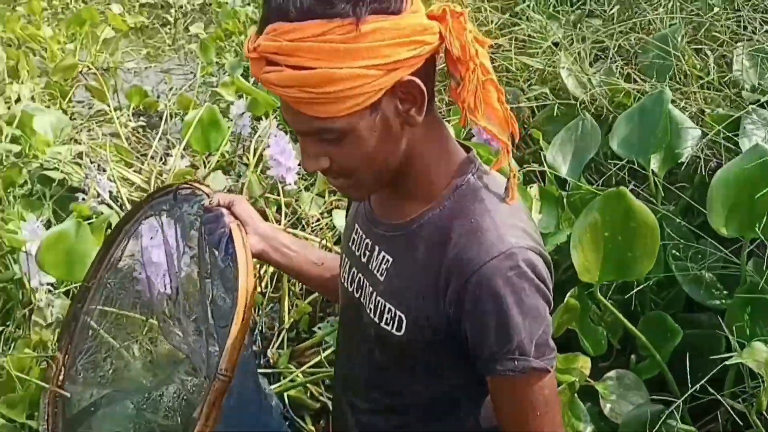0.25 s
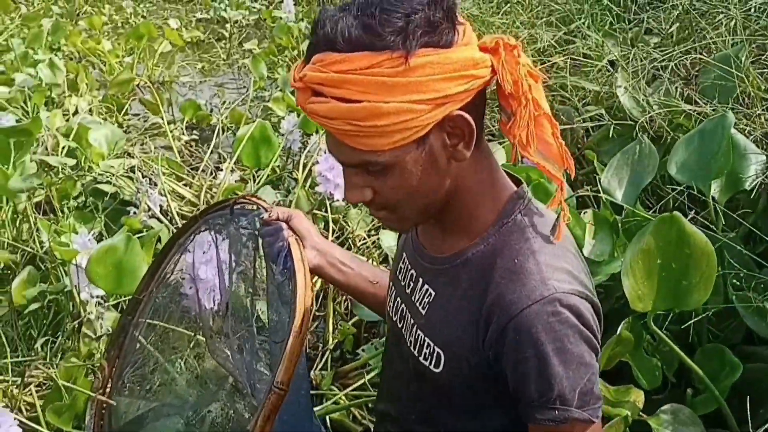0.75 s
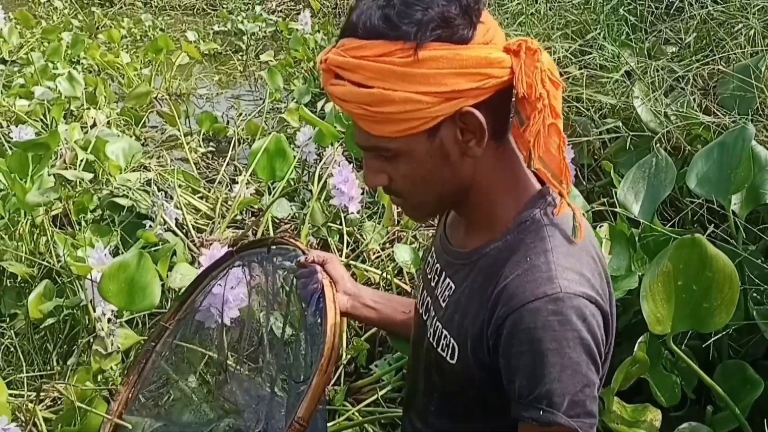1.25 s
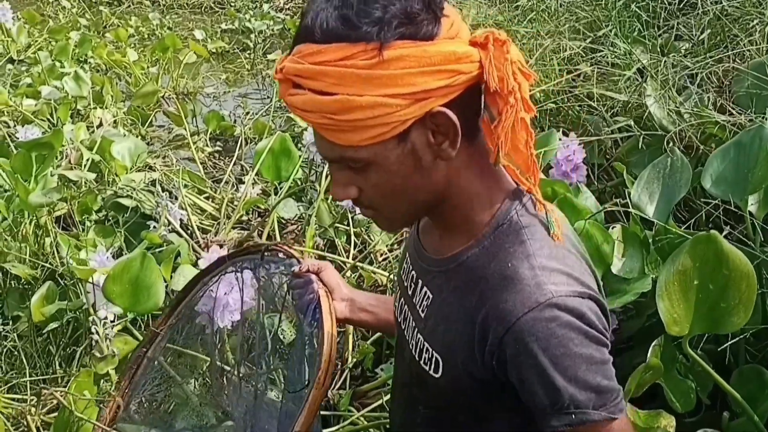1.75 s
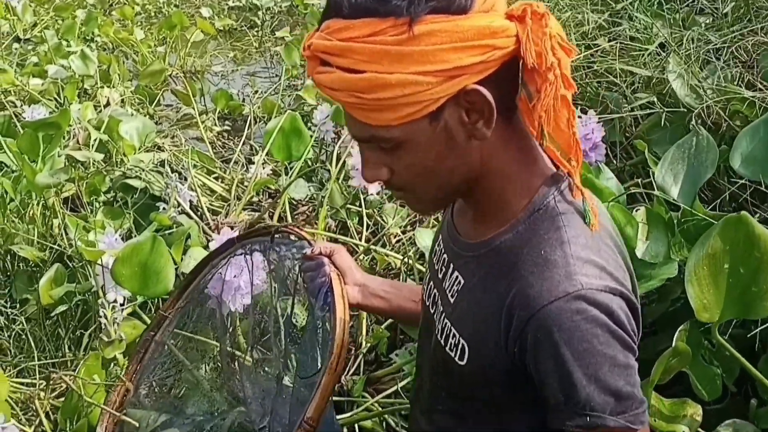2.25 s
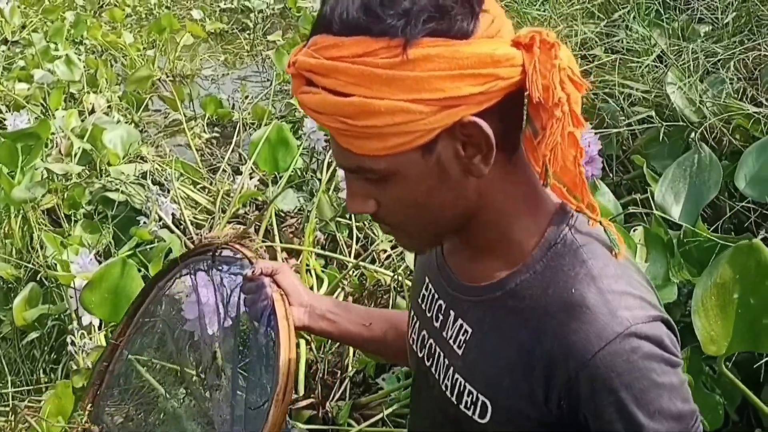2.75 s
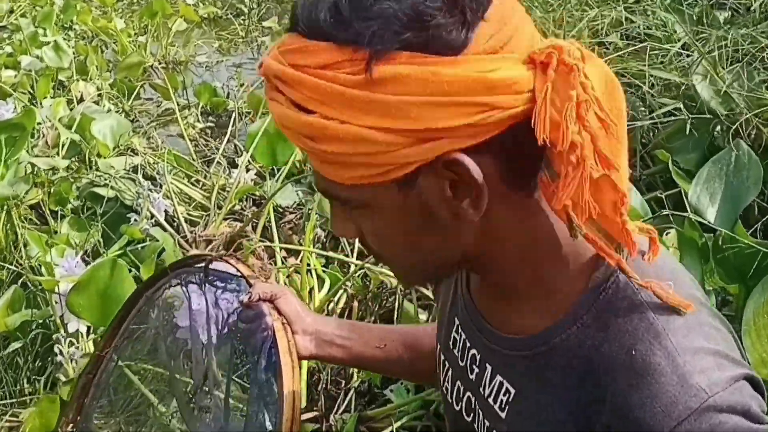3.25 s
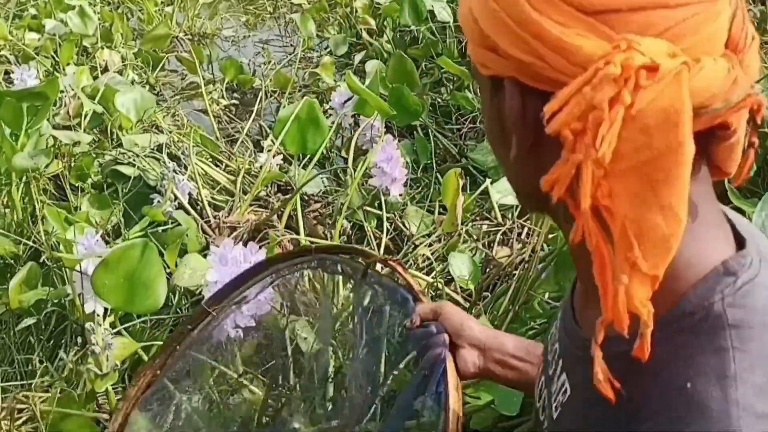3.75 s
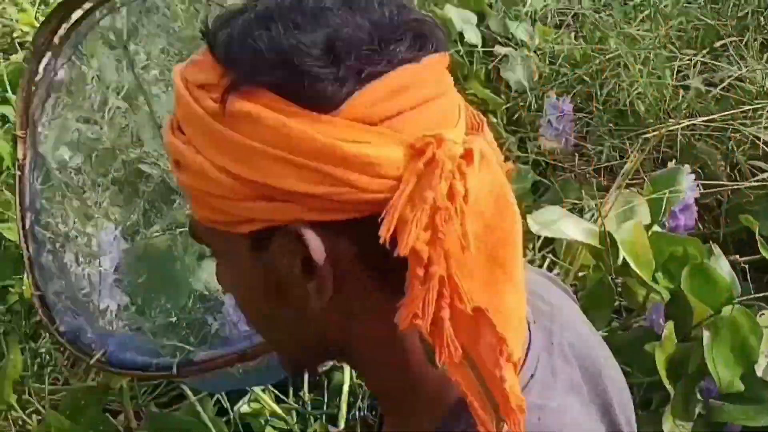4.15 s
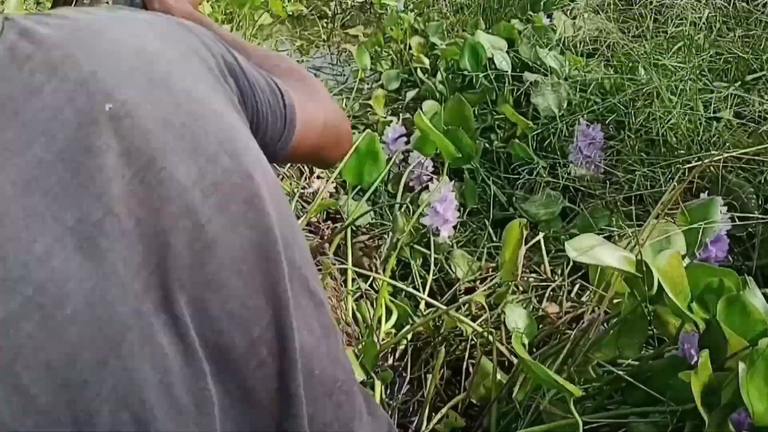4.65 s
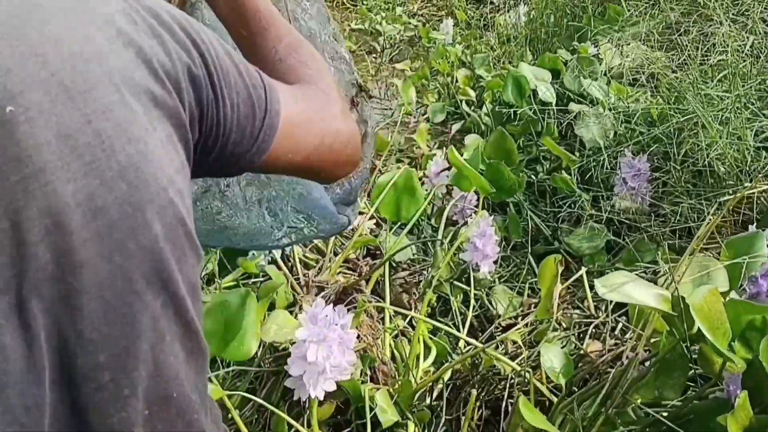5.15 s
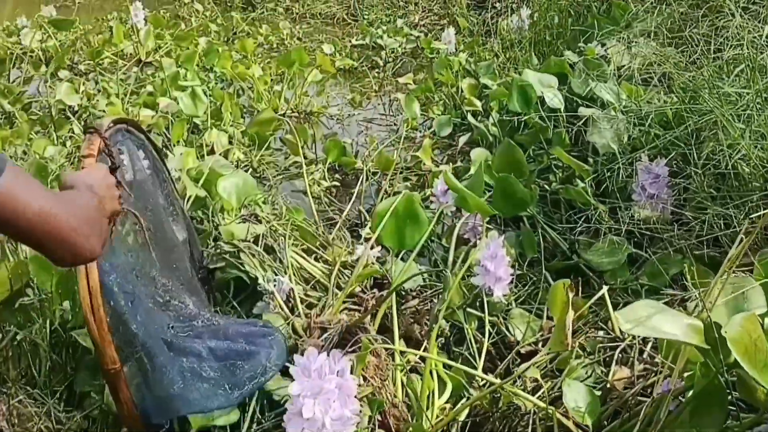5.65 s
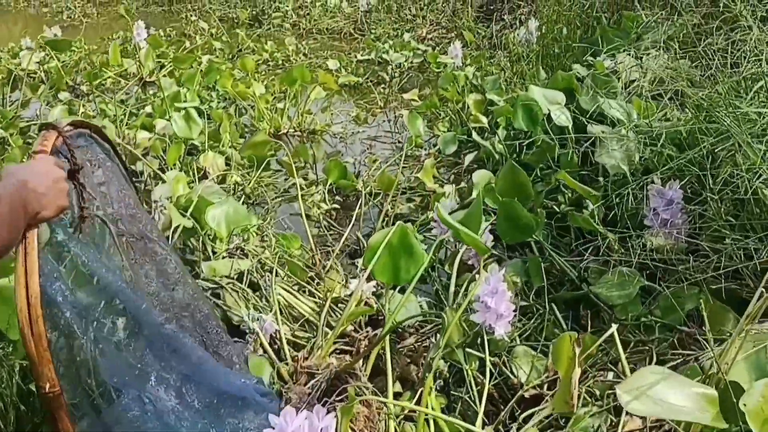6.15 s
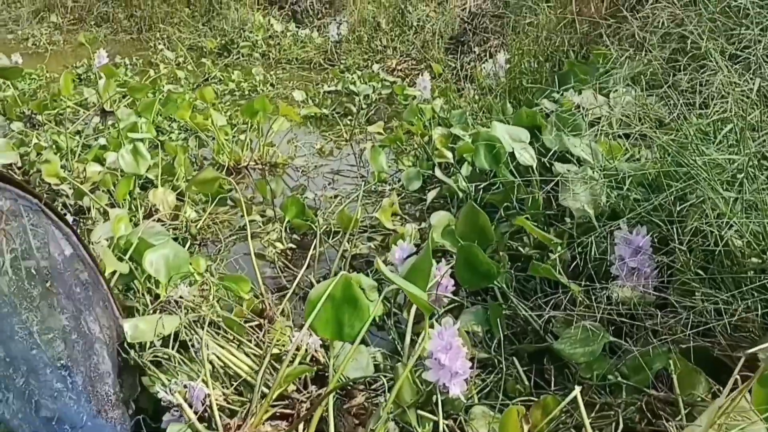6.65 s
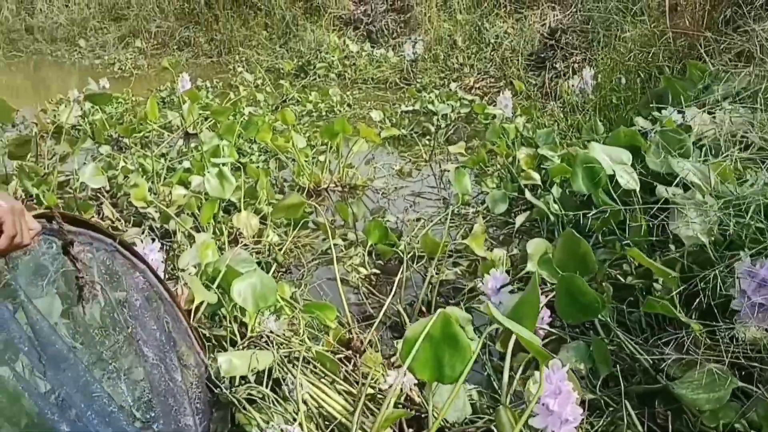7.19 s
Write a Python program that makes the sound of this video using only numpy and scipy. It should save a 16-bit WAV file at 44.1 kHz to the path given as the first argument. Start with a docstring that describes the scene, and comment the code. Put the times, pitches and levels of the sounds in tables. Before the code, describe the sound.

Wet weeds rustle and crackle close up while a hand net sloshes through shallow water, with plops, spray hiss and dripping, growing busier toward the end.

```python
"""In shallow outdoor water choked with weeds, someone wades and works a hand net close to a microphone.
A little wind bumps the microphone, mostly at first: coloured noise and short low sines.
The water sloshes, plops and drains through the mesh as gliding sine bubbles and resonant drops;
spray splats and hisses as filtered grains. Wet leaves rustle as clumped clicks, and stems crackle as
runs of fibre cracks that excite resonances. Both channels are alike."""
import sys
import numpy as np
from scipy import signal
from scipy.fft import rfft, irfft, next_fast_len
from scipy.io import wavfile
from scipy.ndimage import uniform_filter1d

SR = 44100
rng = np.random.default_rng(int(sys.argv[2]) if len(sys.argv) > 2 else 0)


def bounce(signal):
    """Save signal as a 16-bit WAV file at the path given by the first command-line argument."""
    frames = np.transpose(np.atleast_2d(signal))
    limited = np.clip(frames, -1, 1)
    pcm = np.round(limited * 32767).astype(np.int16)
    wavfile.write(sys.argv[1], SR, pcm)


N = 327222
TIME = np.arange(N) / SR
STILL_AIR_DB = -55.5
CUTOFF_HZ = 15520
SLOSH_RISE_SHARE, SLOSH_T60_S = 0.1, 0.8   # the rise is a share of the hold: long pushes swell slowly
BRUSH_T60_S = 0.071

# Spectra of unit-power noises. Each row: frequency in Hz, relative density in dB per Hz.
STILL_AIR_SPECTRUM = [(25, -8), (40, -8), (70, 8), (130, 7), (250, 5.5), (450, 4), (800, -6), (1400, -19),
                      (2100, -7), (2600, -25), (4150, -25), (4450, -5), (7000, 3), (11000, -29),
                      (15000, -3.5)]
GUST_SPECTRUM = [(25, -1.5), (50, -8), (85, -1.5), (140, -3.5), (220, -15), (400, -22), (1000, -49)]
CHURN_SPECTRUM = [(50, -32), (130, -11.5), (260, -7.5), (370, -5.5), (600, 0), (1000, -6), (1600, -8)]
SPATTER_SPECTRUM = [(500, -10), (1200, -11.5), (1650, -5.5), (2100, -4), (2600, -6.5), (3400, -4.5),
                    (4500, -8.5), (7000, 5)]
SPLAT_SPECTRUM = [(200, 4), (550, 9.5), (1300, -6.5), (3200, 7.5), (7000, -34), (15000, 5)]
SPRAY_SPECTRUM = [(300, -36), (560, 0.5), (800, -14), (1400, -12), (2400, -7), (3400, -10), (4900, -4.5),
                  (7000, 0.5), (8900, -4.5), (11300, -6.5), (12400, -7), (15000, -5.5)]
MESH_SPECTRUM = [(5000, -34), (8500, -12.5), (10800, -14), (12500, -9), (14500, -5.5), (15600, -6)]
LEAF_SPECTRUM = [(1500, -52.5), (3000, -8.5), (4100, -4.5), (4450, -1), (5600, 0.5), (6700, 3), (7600, 0.5),
                 (9000, -6), (11000, -12), (15500, -20)]
# Wind on the microphone, one gust and then a light breeze. Each row: time in seconds,
# strength in dB before flutter.
WIND_STRENGTH = [(0, -38.5), (0.45, -53), (0.92, -53), (1.17, -64), (2.0, -63.5), (7.42, -63)]
# Dull bumps on the microphone. Each row: start in seconds, level in dB, starting pitch in Hz, T60 in seconds.
WIND_BUMPS = [(0.03, -30.5, 124, 0.11), (0.146, -28, 157, 0.025), (0.183, -16, 94, 0.038),
              (0.209, -25.5, 138, 0.032), (0.307, -27.5, 115, 0.019), (0.254, -39, 75, 0.093),
              (0.398, -35, 80, 0.15), (0.409, -34.5, 160, 0.069), (0.465, -42, 99, 0.11),
              (0.549, -43.5, 144, 0.13), (0.626, -47, 85, 0.16), (0.749, -40, 108, 0.093),
              (0.89, -40, 65, .13), (0.921, -36.5, 165, 0.036), (2.935, -43.5, 106, .06),
              (4.052, -34.5, 79, 0.039), (4.068, -34.5, 109, 0.093)]
# Steps and pushes that stir the water. Each row: start in seconds, bubbling in dB and spatter in dB
# (both before the mix inside slosh), hold in seconds.
WATER_PUSHES = [(0.0, -52.5, -45.5, 0.014), (1.26, -63.5, -70, 0.035), (1.375, -61.5, -63, 0.21),
                (1.64, -64, -59, 0.26), (2.712, -56, -50, 0.13), (3.123, -62.5, -55.5, 0.27),
                (3.378, -52.5, -49, 0.15), (3.675, -72, -54, 0.14), (3.84, -54, -50, 0.3),
                (4.246, -58.5, -56, 0.2), (4.51, -63.5, -55, 0.49), (4.896, -59, -50, 0.18),
                (5.077, -47, -45.5, 0.21), (5.482, -48.5, -42, 0.02), (5.697, -50.5, -46.5, 0.081),
                (6.144, -51, -49, 0.31), (6.81, -57, -50.5, 0.27), (7.116, -50, -43.5, 0.24)]
# Single large bubbles. Each row: start in seconds, level in dB, starting pitch in Hz, T60 in seconds,
# rise in octaves per second.
LARGE_BUBBLES = [(0.071, -34.5, 562, 0.081, -1), (0.147, -38, 3360, 0.022, 3), (0.822, -49, 3280, 0.06, 1),
                 (1.400, -48, 1055, 0.044, -2), (1.408, -39.5, 416, 0.064, 50),
                 (1.461, -38, 1620, 0.022, 16), (1.508, -47, 376, 0.3, -2.5), (1.585, -50, 673, .15, 3.5),
                 (1.649, -44, 1280, 0.054, -1), (1.655, -45, 2610, 0.025, 6), (1.676, -49, 595, 0.08, 6),
                 (1.739, -47.5, 473, 0.054, -1), (1.783, -47, 3020, .04, 7), (1.807, -48.5, 540, .07, 7.5),
                 (1.813, -52, 1650, .05, 6), (2.226, -44, 290, 0.1, -5.5), (2.243, -38.5, 250, 0.16, -14.5),
                 (3.116, -42.5, 1800, .03, -4), (3.357, -40, 325, 0.053, 7), (3.446, -25, 420, 0.094, -0.5),
                 (3.861, -40.5, 640, 0.058, 8), (3.897, -44.5, 760, .11, 8), (3.901, -47, 1220, 0.055, -2),
                 (3.935, -45.5, 402, .06, -3), (3.974, -30.5, 633, 0.082, 0.5),
                 (3.967, -38.5, 900, 0.073, -4), (3.990, -33, 606, 0.021, 22),
                 (4.046, -40.5, 1640, 0.053, -4), (4.075, -43, 810, .055, 4), (4.16, -43.5, 700, 0.061, 9),
                 (4.266, -41, 385, 0.053, -10), (4.359, -42, 430, 0.052, 7),
                 (4.895, -41.5, 1950, 0.064, -8), (5.094, -22, 460, 0.069, 20),
                 (5.201, -39.5, 520, 0.14, -1), (5.270, -36, 1700, 0.03, 10), (5.496, -39, 578, 0.12, 1.5),
                 (5.506, -37.5, 1080, 0.094, 10), (5.613, -34, 1505, 0.032, -2),
                 (6.173, -35, 880, 0.057, -3), (6.247, -32.5, 2110, 0.032, 6), (6.277, -37, 900, .06, 3),
                 (6.531, -36.5, 2085, 0.064, -1), (6.996, -37.5, 516, 0.037, 0), (7.102, -40, 837, .07, -5),
                 (7.119, -37.5, 714, 0.093, -2.5), (7.178, -35, 1135, 0.052, 5), (7.203, -31, 646, 0.15, 0),
                 (7.218, -29.5, 1010, .035, 12), (7.239, -34, 492, 0.13, -1),
                 (7.288, -31.5, 1000, 0.026, -3), (7.333, -40, 578, 0.2, 2.5),
                 (7.363, -36, 677, 0.14, -0.5), (7.406, -29.5, 630, 0.059, 17)]
# Flat wet slaps of leaves and hoop on the water. Each row: start in seconds, peak in dB, pitch in Hz,
# width in Hz of each of two resonances, T60 in seconds of the drops.
WET_SLAPS = [(1.389, -43, 1240, 900, .1), (1.547, -41, 1580, 1800, 0.095), (1.664, -40.5, 1700, 1600, .045),
             (1.864, -38, 2320, 2800, 0.024), (3.356, -31, 1700, 5000, 0.077), (3.996, -37, 900, 900, .06),
             (5.1, -28.5, 1750, 500, 0.046), (5.12, -32, 770, 400, 0.16), (5.325, -32, 2400, 900, 0.052),
             (5.381, -29, 2290, 1600, .03), (6.387, -27.5, 1520, 1400, 0.11),
             (6.42, -33.5, 790, 900, 0.037), (6.456, -37.5, 1670, 1100, 0.037),
             (7.208, -29.5, 1150, 600, .08)]
# Bursts of spray. Each row: start in seconds, hiss in dB, swell in seconds, hold in seconds,
# hiss T60 in seconds, opening splat in dB, resonance in dB relative to the hiss.
SPRAY_BURSTS = [(0.033, -39, 0.033, 0.059, 0.14, -35.5, -11.5),
                (2.542, -35.5, 0.0088, 0.086, 0.7, -37.5, 0.5), (7.169, -56, 0.0069, .03, .2, -37.5, -20)]
# Resonances of the hiss. Each row: pitch in Hz, width in Hz, relative level in dB.
SPRAY_RESONANCES = [(3370, 780, 2.5), (4030, 530, -5), (6450, 2100, 0.5), (11000, 1500, -9)]
# The wet net is dragged along and drains. Each row: middle in seconds, fizz in dB, length in seconds,
# dripping in dB before the mix.
NET_DRAGS = [(0.908, -48, 0.035, -70), (1.136, -50, 0.04, -70), (4.297, -53, 0.076, -52),
             (5.665, -50, 0.31, -55), (6.14, -41.5, 0.34, -61), (6.85, -48, 1, -52),
             (7.42, -38, 0.078, -43.5)]
# How hard legs and net push through the weeds. Each row: time in seconds, effort in dB.
WADING_EFFORT = [(0, -42.5), (0.4, -47.5), (1.0, -51), (1.26, -52), (1.5, -49.5), (2.5, -49.5), (2.85, -45),
                 (3.2, -46), (3.5, -42.5), (3.65, -47), (4.2, -42), (4.45, -46), (4.9, -47.5), (5.02, -38),
                 (5.45, -44.5), (6.25, -35.5), (6.45, -41), (6.95, -40), (7.03, -42.5), (7.2, -41.5),
                 (7.42, -38.5)]
# Stalks rasp along the mesh. Each row: middle in seconds, level in dB, length in seconds, mean pitch in Hz.
STALK_RASPS = [(0.752, -59.5, 0.56, 4540), (2.744, -41, 0.036, 3470), (3.8, -59, 0.1, 2040),
               (6.089, -43, 0.043, 2300), (6.167, -42.5, 0.026, 2800), (6.229, -48, 0.25, 2120),
               (6.281, -46.5, 0.1, 3070)]
# A leaf catches on a leg or the hoop, slides and slips off. Each row: start in seconds, level in dB
# before the mix, rise in seconds, hold in seconds, pitch in Hz, wet fizz in dB relative to the level.
LEAF_BRUSHES = [(0.237, -44.5, .008, 0.021, 6700, -24), (0.432, -50, 0.0063, 0.015, 6000, -4),
                (0.546, -43.5, 0.0089, 0.012, 6400, -16), (0.615, -49.5, .01, .04, 6700, -19),
                (0.782, -50, 0.0092, 0.036, 5730, -19), (0.856, -47, 0.0088, 0.099, 5560, -16),
                (1.116, -49, .01, 0.029, 8200, -8), (1.225, -50.5, .005, 0.012, 5600, -26),
                (1.454, -44, 0.0041, 0.0056, 6100, -14), (1.487, -47.5, 0.0036, 0.034, 6900, -8),
                (1.552, -45, 0.005, 0.012, 5700, -24), (1.76, -49.5, 0.0088, 0.086, 6040, -9),
                (1.946, -44, 0.006, 0.01, 4460, -18), (1.983, -45, 0.016, 0.011, 5900, -24),
                (2.106, -40, 0.057, 0.021, 5800, -29), (2.411, -49, 0.0092, 0.012, 4970, -11),
                (2.945, -43, .006, 0.043, 5600, -16), (2.998, -40, .002, 0.002, 4560, -9),
                (3.295, -35.5, .003, 0.024, 5600, -12), (3.397, -47, .003, 0.04, 5030, -8),
                (3.467, -44.5, .005, 0.12, 5600, -15), (3.727, -41, .004, 0.028, 5100, -9),
                (4.13, -47, .005, 0.037, 6540, -18), (4.249, -39, 0.054, 0.026, 6300, -13),
                (4.682, -46.5, .02, 0.09, 6250, -9), (4.86, -41, 0.0054, 0.009, 6000, -22),
                (5.028, -44, 0.018, .06, 6550, -13), (5.27, -42.5, .02, 0.066, 5500, -13),
                (5.376, -36.5, .006, 0.014, 5700, -11), (5.485, -40, .006, 0.044, 5500, -9),
                (5.746, -36, 0.032, 0.018, 4830, -27), (6.197, -36, .003, 0.012, 6300, -14),
                (6.282, -36.5, 0.018, .02, 6360, -22), (6.331, -32, .008, 0.037, 6650, -18),
                (6.448, -41, .006, 0.015, 6560, -22), (6.602, -32, 0.0039, 0.032, 5500, -25),
                (6.673, -36, 0.0036, 0.012, 7750, -18), (6.788, -39.5, .005, 0.037, 5540, -34),
                (6.87, -30.5, 0.03, 0.0047, 4040, -28), (7.133, -41.5, .004, 0.07, 4070, -8),
                (7.4, -36, .005, .02, 6200, 1)]
# Stems crack. Each row: start in seconds, peak in dB, pitch in Hz, treble share in dB and
# squelch share in dB (both before a common trim), T60 in seconds.
STEM_SNAPS = [(0.17, -25, 7430, -18, -32, 0.059), (0.199, -32, 6740, -22, -28, 0.028),
              (0.298, -26, 14500, -12, -23, 0.11), (0.336, -26, 7700, -9, -26, .008),
              (0.476, -27, 7300, -4, -31, 0.076), (0.66, -28.5, 5740, -8, -33, 0.071),
              (0.765, -28.5, 6800, -12, -36, 0.073), (0.776, -26.5, 6900, 0, -28, .045),
              (0.828, -32, 7000, 2, -26, .065), (0.96, -28.5, 6240, -5, -33, .025),
              (1.087, -28.5, 5870, -8, -38, 0.11), (1.353, -33, 6440, -7, -29, .04),
              (2.137, -30, 5990, -9, -15, 0.055), (2.275, -31.5, 6500, -2, -4, 0.054),
              (2.553, -27, 6500, -3, -4, 0.012), (2.566, -18, 7000, -6, -6, 0.0099),
              (2.831, -24.5, 6700, -12, -29.5, .065), (2.888, -22, 14600, -6, -29, 0.066),
              (2.896, -25, 6760, 2, -26.5, .035), (2.998, -23, 4580, -22, -30, 0.021),
              (3.129, -24.5, 7600, -12, -13, .035), (3.138, -23.5, 6600, -1, -7, 0.099),
              (3.27, -27, 13900, -4, -18, 0.041), (3.359, -25, 4500, -29, -10, 0.077),
              (3.398, -29.5, 5200, -19, -14, 0.048), (3.495, -26, 5480, -14, -22, .045),
              (3.507, -19, 6800, -9, -18, 0.052), (3.683, -21, 6160, -8, -19, 0.1),
              (4.161, -23.5, 6500, -12, -14, 0.027), (4.672, -28.5, 6450, -9, -32, 0.12),
              (5.005, -19.5, 7610, -3, -27, 0.072), (5.212, -21, 6900, 0, -15, .055),
              (5.271, -20.5, 4670, -2, -8, 0.076), (5.383, -27, 5800, -13, -4, 0.11),
              (5.492, -28, 5290, -11.5, 4, 0.082), (5.776, -27, 4950, -16, -28, 0.026),
              (6.064, -23, 13700, -12, -13, .05), (6.202, -17.5, 6400, -17, -21, .035),
              (6.383, -17, 6660, -21, -28, 0.0082), (6.402, -18, 6960, -14, -18, .012),
              (6.496, -17.5, 6820, -6, -31, 0.011), (6.562, -23.5, 6800, -1.5, -30, 0.089),
              (6.675, -20, 7250, -6, -24, .025), (6.887, -20, 6450, -8, -19, 0.021),
              (7.184, -21, 7060, -3, -18, .03), (7.364, -20, 6700, -4, -19, .05)]


def from_db(db):
    """Decibels to amplitude gain."""
    return 10 ** (np.asarray(db) / 20)


def rms_one(x):
    """Normalisation to unit mean power."""
    return x / np.sqrt(np.mean(x ** 2) + 1e-20)


def add(out, s, sound):
    """Superposition: a short sound is mixed in at time s."""
    start = int(np.clip(round(s * SR), 0, N - 1))
    out[start:start + len(sound)] += sound[:N - start]


def colour(x, spectrum):
    """Minimum-phase filtering: a folded cepstrum gives a causal filter of the spectrum; unit power out."""
    size = 2 * next_fast_len(N // 2 + 4096)
    hz, db = np.transpose(spectrum)
    bins_hz = np.arange(size // 2 + 1) * SR / size
    log_gain = np.log(from_db(np.interp(np.log(bins_hz + 1), np.log(hz), db)))
    cepstrum = irfft(log_gain)[:size // 2]
    response = np.exp(rfft(2 * cepstrum, size) - cepstrum[0])
    return rms_one(irfft(rfft(x, size) * response)[:N])


def resonate(x, hz, width_hz):
    """A damped oscillator: one resonance with gain 1 on top."""
    r = np.exp(-np.pi * width_hz / SR)
    zeros = np.array([1, 0, -1]) * (1 - r * r) / 2
    poles = [1, -2 * r * np.cos(2 * np.pi * hz / SR), r * r]
    return signal.lfilter(zeros, poles, x + 1e-18)


def wavering(x, hz, width_hz, bend, flutter_db, per_s=45, count=600):
    """Modulated resonance: x gates noise in a band whose pitch and strength wander; unit power."""
    t, r = TIME[:len(x)], np.exp(-np.pi * width_hz / SR)
    walks = np.clip(rng.standard_normal((2, count)), -2, 2)
    pitch, strength = (np.interp(t * per_s, np.arange(count), walk) for walk in walks)
    driven = x * rng.standard_normal((2, len(x))) + 1e-18
    sine, cosine = signal.lfilter([1], [1, -2 * r, r * r], driven)
    phase = 2 * np.pi * np.cumsum(hz * (1 + bend * pitch)) / SR
    return rms_one(from_db(flutter_db * strength) * (sine * np.sin(phase) + cosine * np.cos(phase)))


def even(x):
    """Power equalisation: steady over a tenth of a second, with the finer grain left in."""
    power = np.abs(uniform_filter1d(x * x, SR // 10))
    return x / np.sqrt(power + 1e-4 * np.mean(x * x))


def clumps(per_s=45, fall_s=0.084):
    """Relaxation: tugs at random moments start at once and decay exponentially; zero mean, spread 1."""
    tugs = (rng.random(N) < per_s / SR) * rng.uniform(0.13, 1, N)
    strain = signal.lfilter([1], [1, -np.exp(-1 / (fall_s * SR))], tugs)
    return rms_one(strain - strain.mean())


def grains(per_s, size_db, clump_db, patch_db, low_hz, high_hz, sharpness, count=32):
    """Random impulses: clumps of uneven clicks each ring at one of many pitches, which come and go."""
    spread = size_db * np.minimum(rng.exponential(1, N), 4)
    sizes = from_db(spread + clump_db * np.minimum(clumps(), 3)) * rng.choice([-1, 1], N)
    clicks = sizes * (rng.random(N) < per_s / SR)
    dealt = rng.integers(0, count, N)
    out = np.zeros(N)
    for k, hz in enumerate(np.geomspace(low_hz, min(high_hz, .45 * SR), count)):
        mine = np.flatnonzero((dealt == k) & (clicks != 0))
        moment = mine * 50 // SR   # each pitch has a new strength every 1/50 s
        patches = patch_db * np.clip(rng.standard_normal(512), -2, 2)
        struck = np.zeros(N)
        struck[mine] = clicks[mine] * from_db(patches[moment])
        out += resonate(struck, hz, hz / sharpness)
    return out


def bubble(hz, swell_s, t60, rise):
    """Volume oscillation of an air pocket: a sine swells, then dies away while its pitch glides."""
    t = TIME[:int((swell_s + t60) * SR) + 2]
    shape = np.minimum(t / swell_s, 1) ** .5 * from_db(-60 * np.maximum(t - swell_s, 0) / t60)
    glide_hz = np.minimum(hz * 2 ** (rise * t), SR / 4)
    return shape * np.sin(2 * np.pi * np.cumsum(glide_hz) / SR)


def swarm(per_s, low_hz, high_hz, size_db, cycles, rise, count=4000):
    """Random bubble births: low ones are commonest and tend to be loudest; steady power."""
    out = np.zeros(N)
    births = np.cumsum(rng.exponential(1 / per_s, count))
    places = rng.random(count)
    sizes, glides = rng.standard_normal((2, count))
    for s, place, size, glide in zip(births, places, sizes, glides):
        hz = low_hz * (high_hz / low_hz) ** (place ** 1.284)
        if s < TIME[-1]:
            gain = from_db(size_db * min(size, 2) - place)
            add(out, s, gain * bubble(hz, 1 / hz, cycles / hz, rise * (1 + glide)))
    return even(out)


def bell(t, length):
    """Gaussian envelope about t = 0 that stays above half power for the given length."""
    return 2 ** (-2 * np.minimum((t / length) ** 2, 20))


def hold_and_fall(t, rise, hold, t60):
    """Envelope with a linear rise, a hold and an exponential decay."""
    return np.minimum(t / rise, 1) * from_db(-60 * np.maximum(t - rise - hold, 0) / t60)


def effort():
    """Driving force: the push through the weeds as a gain per sample."""
    return from_db(np.interp(TIME, *np.transpose(WADING_EFFORT)))


def dragging():
    """Driving force: gains of fizz and dripping as each drag of the net swells and fades."""
    return sum(np.outer(from_db([fizz_db, drip_db]), bell(TIME - s, length))
               for s, fizz_db, length, drip_db in NET_DRAGS)


def stirring(wading_db=-22, drip_db=-14):
    """Addition of powers: sloshes, wading and the draining net combine in bubbling and spatter gains."""
    power = np.outer(from_db([wading_db, drip_db]), effort()) ** 2
    power[1] += dragging()[1] ** 2
    for s, bubbling_db, spatter_db, hold in WATER_PUSHES:
        near = (TIME >= s) & (TIME < s + hold + SLOSH_T60_S)
        shape = hold_and_fall(TIME[near] - s, SLOSH_RISE_SHARE * hold, hold, SLOSH_T60_S)
        power[:, near] += np.outer(from_db([bubbling_db, spatter_db]), shape) ** 2
    return np.sqrt(power)


def still_air():
    """Stationary noise: the still air of the marsh as a steady coloured floor."""
    return from_db(STILL_AIR_DB) * colour(rng.standard_normal(N), STILL_AIR_SPECTRUM)


def wind(flutter_db=0.5):
    """Amplitude-modulated low noise: a dying gust and a light breeze flutter, with separate buffets."""
    flutter = flutter_db * np.minimum(clumps(per_s=24, fall_s=0.012), 3)
    strength = from_db(np.interp(TIME, *np.transpose(WIND_STRENGTH)) + flutter)
    out = strength * colour(rng.standard_normal(N), GUST_SPECTRUM)
    for s, db, hz, t60 in WIND_BUMPS:
        add(out, s, from_db(db) * bubble(hz, 0.0032, t60, 2.0))   # a buffet is a low decaying sine
    return out


def slosh():
    """Bubble entrainment: stirred water traps swarms over a churn; drops spatter and tinkle on top."""
    bubbling, spatter = stirring()
    # each wavelet drives churn and drops together
    lap = from_db(1.64 * np.minimum(clumps(per_s=67, fall_s=0.009), 3))
    gurgle = swarm(per_s=260, low_hz=481.0, high_hz=1800, size_db=2.5, cycles=28.0, rise=5.5)
    churn_grains = grains(per_s=4000, size_db=4.0, clump_db=7.5, patch_db=4.0,
                          low_hz=233.0, high_hz=1750, sharpness=5.2)
    churn = even(lap * colour(churn_grains, CHURN_SPECTRUM))
    drop_grains = grains(per_s=5000, size_db=2.0, clump_db=3.0, patch_db=3.0,
                         low_hz=900, high_hz=5023, sharpness=40.0)
    drops = even(lap * colour(drop_grains, SPATTER_SPECTRUM))
    tinkle = swarm(per_s=150, low_hz=1800, high_hz=3590, size_db=8.5, cycles=170, rise=1.68)
    body = from_db(-3.5) * gurgle + from_db(0.5) * churn
    surface = from_db(-1.5) * drops + from_db(-10.0) * tinkle
    return bubbling * body + spatter * surface


def plops(swell_s=0.0029, shed_db=-12, shed_s=0.031, clean_rise=2.7,
          froth_db=-14, froth_t60=0.13, froth_width=0.38, count=3):
    """Cavity resonance: air pockets close under net and legs, stir up froth and shed bubbles if gliding."""
    out, t = np.zeros(N), TIME[:SR // 5]
    for s, db, hz, t60, rise in LARGE_BUBBLES:
        add(out, s, from_db(db) * bubble(hz, swell_s, max(t60, .005), rise))
        width_hz = froth_width * hz
        froth = resonate(resonate(rng.standard_normal(len(t)), hz, width_hz), hz, width_hz)
        fade = np.minimum(t / swell_s, 1) * from_db(db + froth_db - 60 * t / froth_t60)
        add(out, s, fade * rms_one(froth))
        unrest = abs(rise) / np.hypot(rise, clean_rise)   # 0 for a steady pitch, near 1 for a fast glide
        for late, smaller, softer in rng.random((count, 3)):
            gain = unrest * from_db(db + shed_db - 16 * softer)
            add(out, s + shed_s * (0.221 + 2 * late), gain * bubble(hz * (1.6 + 0.76 * smaller), 0.0017, 0.055, 6.3))
    return out


def slaps(drops_per_s=5000, rise_s=0.0021):
    """Impact on a surface: something flat meets the water in a short, dull burst of tiny splashes."""
    out, t = np.zeros(N), TIME[:SR // 5]
    for s, db, hz, width_hz, t60 in WET_SLAPS:
        drops = rng.standard_normal(len(t)) * (rng.random(len(t)) < drops_per_s / SR)
        splash = drops * np.minimum(t / rise_s, 1) * from_db(-60 * t / t60)
        burst = resonate(resonate(splash, hz, width_hz), hz, width_hz)
        add(out, s, from_db(db) * burst / np.abs(burst).max())
    return out


def sprays(splat_t60=0.27, ring_lasts=1.73):
    """Many small impacts: a broad splat opens into a hiss that decays faster than its resonances."""
    mist = grains(per_s=9000, size_db=1.0, clump_db=-1.0, patch_db=1.5,
                  low_hz=392, high_hz=14400, sharpness=9.3)
    hiss = even(colour(mist, SPRAY_SPECTRUM))
    rings = [from_db(db) * wavering(np.ones(N), hz, width_hz, bend=.012, flutter_db=-1.5)
             for hz, width_hz, db in SPRAY_RESONANCES]
    ringing = rms_one(sum(rings))
    drops = grains(per_s=4000, size_db=3.5, clump_db=1, patch_db=2, low_hz=300, high_hz=15000, sharpness=3)
    splat = even(colour(drops, SPLAT_SPECTRUM))
    out = np.zeros(N)
    for s, db, swell_s, hold, t60, splat_db, ring_db in SPRAY_BURSTS:
        t = np.maximum(TIME - s, 0)
        fall_db = 60 * np.maximum(t - swell_s - hold, 0) / t60
        jet = from_db(db - fall_db) * hiss + from_db(db + ring_db - fall_db / ring_lasts) * ringing
        opening = from_db(splat_db - 60 * t / splat_t60) * splat
        out += np.minimum(t / swell_s, 1) * (jet + opening)
    return out


def draining(level_db=-3):
    """Bubble entrainment: threads of water fall from the dragged net and trap small, bright bubbles."""
    drips = swarm(per_s=660, low_hz=1910, high_hz=3200, size_db=3.0, cycles=55, rise=1.1)
    return from_db(level_db) * dragging()[1] * drips


def net_rumble(level_db=-20, hz=138, width_hz=45):
    """Forced vibration: noise excites a low resonance as the dragged net and its hoop rumble dully."""
    rumble = resonate(resonate(rng.standard_normal(N), hz, width_hz), hz, width_hz)
    return from_db(level_db) * dragging()[0] * rms_one(rumble)


def rasps(slips_per_s=2500, ring_width_hz=420):
    """Stick-slip: a stalk slips over thread after thread of the mesh and rings at a wavering pitch."""
    out, t = np.zeros(N), TIME[:SR] - .5
    for s, db, length, hz in STALK_RASPS:
        slips = rng.random(len(t)) < slips_per_s / SR
        ringing = wavering(slips, hz, ring_width_hz, bend=0.025, flutter_db=3.5)
        add(out, s + t[0], from_db(db) * bell(t, length) * ringing)
    return out


def mesh_fizz():
    """Film rupture: tiny films of water burst in the mesh as high grains; steady power."""
    films = grains(per_s=9100, size_db=2.0, clump_db=-2.5, patch_db=2.5,
                   low_hz=7350, high_hz=15780, sharpness=61)
    return even(colour(films, MESH_SPECTRUM))


def leaf_scrape(beads_db=-9):
    """Friction: leaves scrape in dense clicks, with beads of water bursting on them; unit power."""
    clicks = grains(per_s=9000, size_db=-1.0, clump_db=-0.5, patch_db=2.0,
                    low_hz=2585, high_hz=11460, sharpness=40)
    beads = swarm(per_s=130, low_hz=4400, high_hz=8000, size_db=7, cycles=280, rise=.8)
    return rms_one(even(colour(clicks, LEAF_SPECTRUM)) + from_db(beads_db) * beads)


def weeds(scrape, mesh, leaf_db=-1, mesh_db=-6.0, tug_db=1.0):
    """Friction under a varying force: rustle and mesh fizz follow the effort; one tug shakes both."""
    tug = from_db(tug_db * np.minimum(clumps(per_s=10, fall_s=0.014), 3))
    fizz_gain = np.hypot(from_db(mesh_db) * effort(), dragging()[0])
    return from_db(leaf_db) * effort() * even(tug * scrape) + fizz_gain * even(tug * mesh)


def brushes(scrape, mesh, scrape_db=-5.5, ring_db=-4, ring_width_hz=300, slip_db=1.5):
    """Stick-slip: each leaf takes hold, scrapes in small jerks and lets go, ringing at its own pitch."""
    jerks = from_db(slip_db * np.minimum(clumps(per_s=92, fall_s=0.0015), 3))
    out = np.zeros(N)
    for s, db, rise, hold, hz, fizz_db in LEAF_BRUSHES:
        near = (TIME >= s) & (TIME < s + rise + hold + BRUSH_T60_S)
        shape = from_db(db) * hold_and_fall(TIME[near] - s, rise, hold, BRUSH_T60_S)
        # the reversed scrape supplies other clicks to drive the ringing
        ringing = resonate(scrape[::-1][near], hz, ring_width_hz)
        sliding = from_db(scrape_db) * rms_one(scrape[near]) + from_db(ring_db) * rms_one(ringing)
        out[near] += shape * rms_one(jerks[near]) * (sliding + from_db(fizz_db) * mesh[near])
    return out


def ticks(per_s=30, size_db=4.5, level_db=7.5, ring_width_hz=1500, treble_db=-15, count=400):
    """Elastic release: leaf edges flick free in short dry ticks that scale with the effort."""
    out, t = np.zeros(N), TIME[:SR // 40]
    starts = np.cumsum(rng.exponential(1 / per_s, count))
    for s, place, size in zip(starts, rng.random(count), rng.standard_normal(count)):
        flick = rng.standard_normal(len(t)) ** 3 * from_db(-60 * t / 0.028)   # a few spiky micro-cracks
        treble = from_db(treble_db + 10 * place) * resonate(flick, .33 * SR, 4000)
        tick = resonate(flick, 4600 + 3400 * place, ring_width_hz) + treble
        if s < TIME[-1]:
            add(out, s, from_db(level_db + size_db * min(size, 1.5)) * tick / np.abs(tick).max())
    return effort() * out


def snaps(fibres_per_s=7000, ring_width_hz=380, give_share=0.062, body_db=-10, wet_db=2, treble_db=-1):
    """Brittle fracture: a stem gives way in a run of fibre cracks that ring; wet ones also squelch."""
    out, t = np.zeros(N), TIME[:SR // 5]
    for s, db, hz, treble_share_db, squelch_db, t60 in STEM_SNAPS:
        cracks = rng.standard_normal(len(t)) * (rng.random(len(t)) < fibres_per_s / SR)
        cracks = cracks * from_db(-60 * np.maximum(t - give_share * t60, 0) / t60)
        body = from_db(body_db) * resonate(cracks, 8200, 1800)
        treble = from_db(treble_share_db + treble_db) * resonate(cracks, 13400, 7400)
        squelch = from_db(squelch_db + wet_db) * resonate(cracks, 1560, 2000)
        burst = resonate(cracks, hz, ring_width_hz) + body + treble - squelch
        add(out, s, from_db(db) * burst / np.abs(burst).max())
    return out


def scene():
    """Superposition: air, water, net and plants sum to one signal, the same in both channels."""
    background = still_air() + wind()
    water = slosh() + plops() + slaps() + sprays() + draining()
    scrape, mesh = leaf_scrape(), mesh_fizz()
    plants = rasps() + weeds(scrape, mesh) + brushes(scrape, mesh) + ticks() + snaps()
    mono = background + water + net_rumble() + plants
    return np.array([mono, mono])


def record(dry):
    """Band limiting: the microphone drops the deep bass, and the top is cut steeply."""
    thin = signal.sosfilt(signal.butter(4, 45, "high", fs=SR, output="sos"), dry)
    return signal.sosfilt(signal.ellip(12, .2, 80, CUTOFF_HZ, fs=SR, output="sos"), thin)


dry = scene()
out = record(dry)
bounce(out)
```